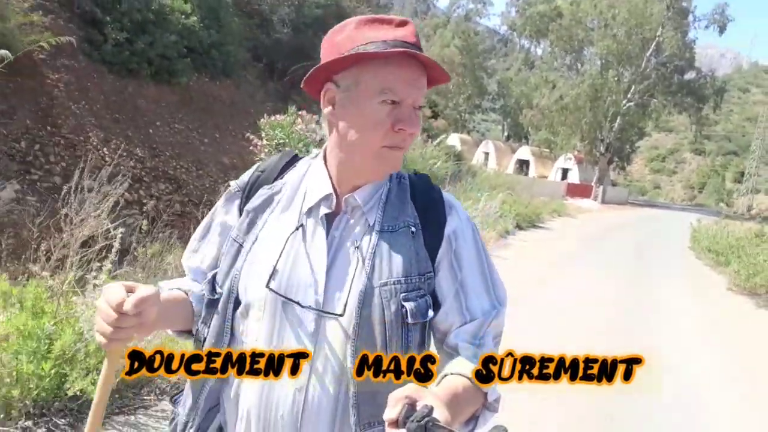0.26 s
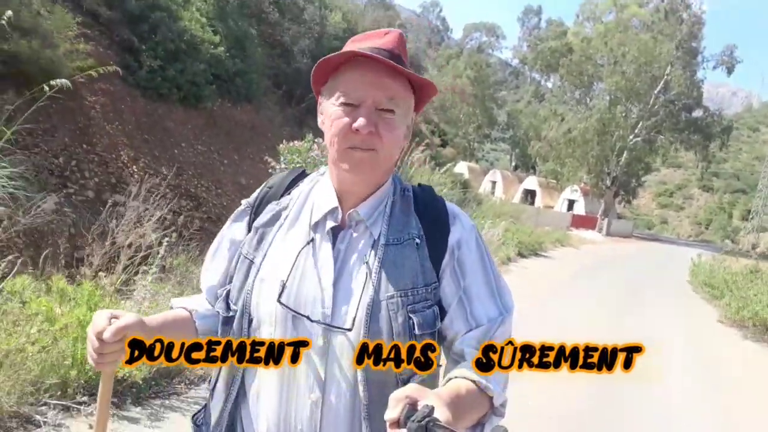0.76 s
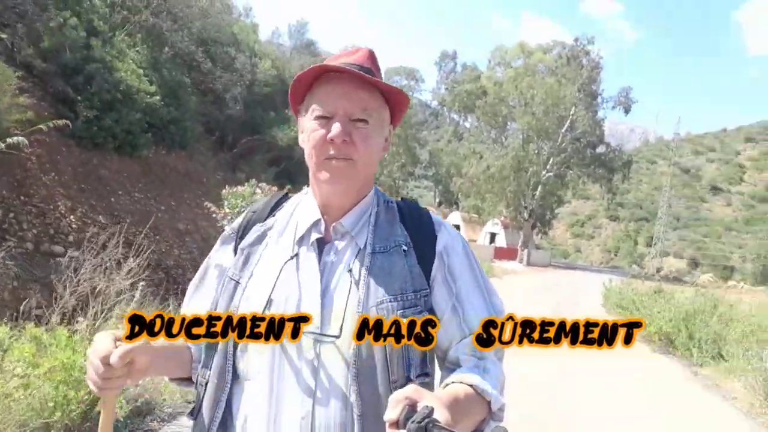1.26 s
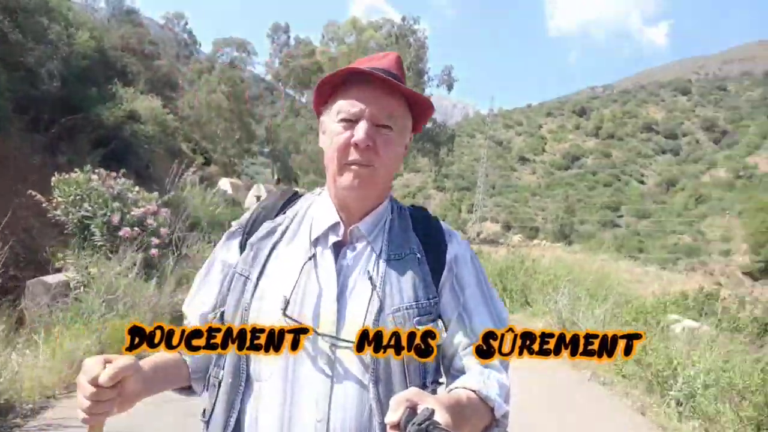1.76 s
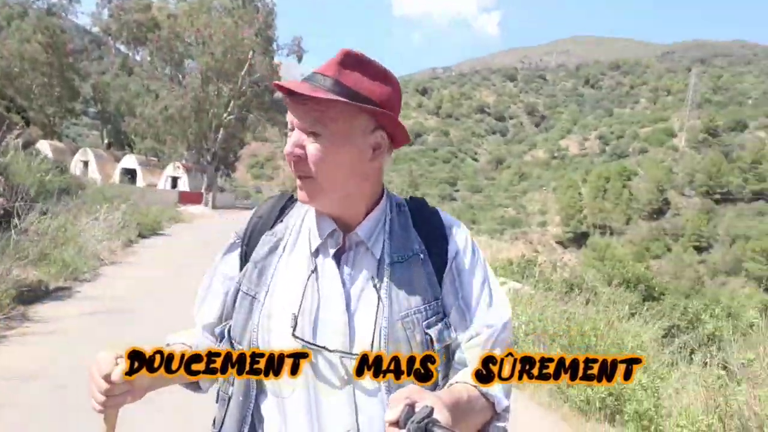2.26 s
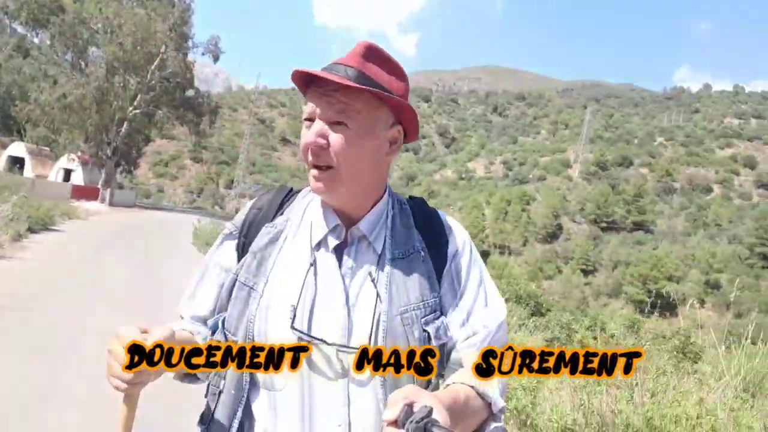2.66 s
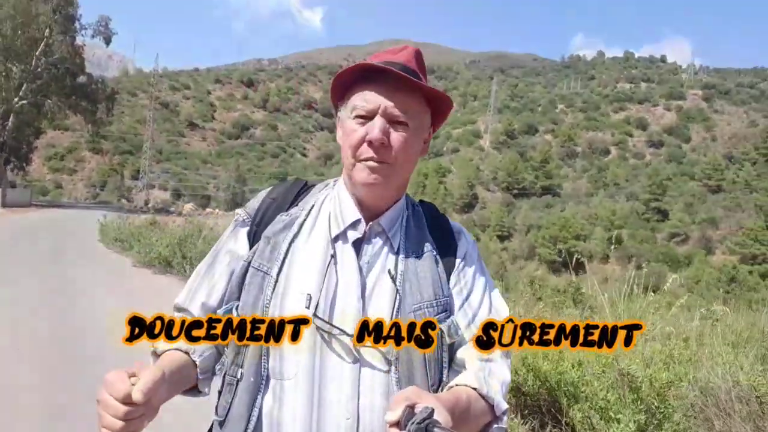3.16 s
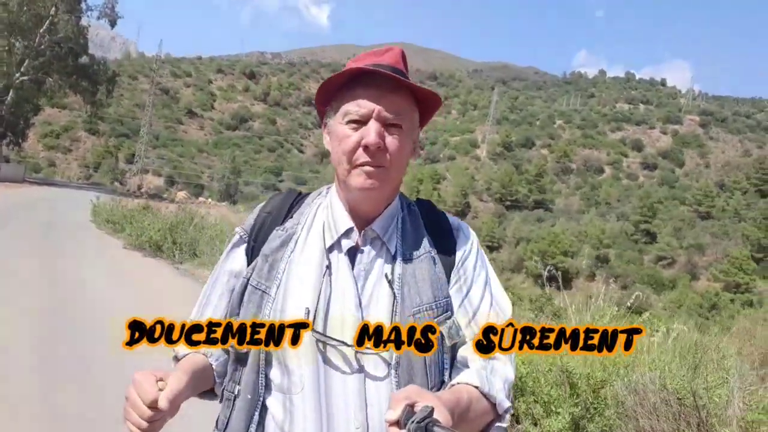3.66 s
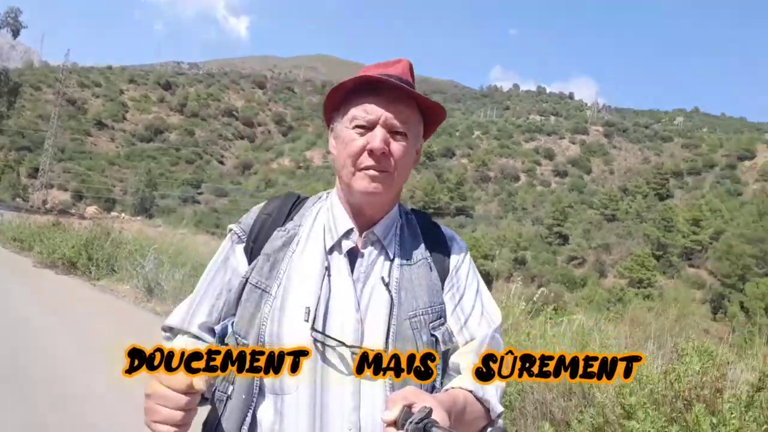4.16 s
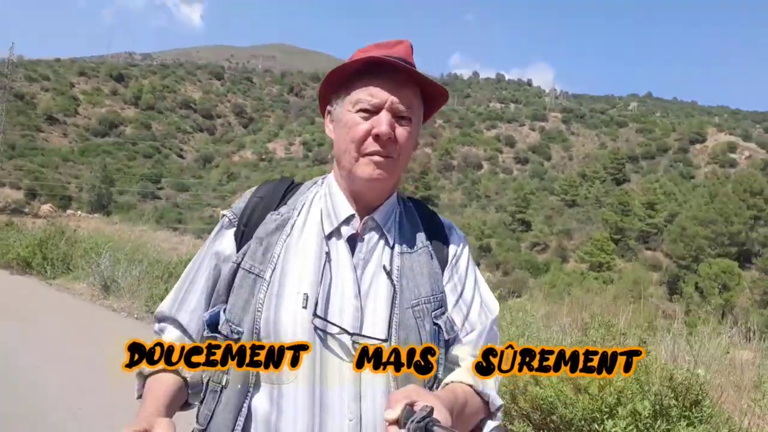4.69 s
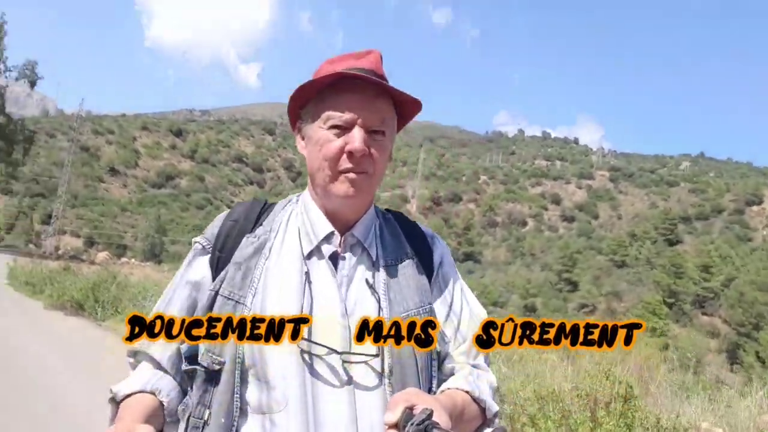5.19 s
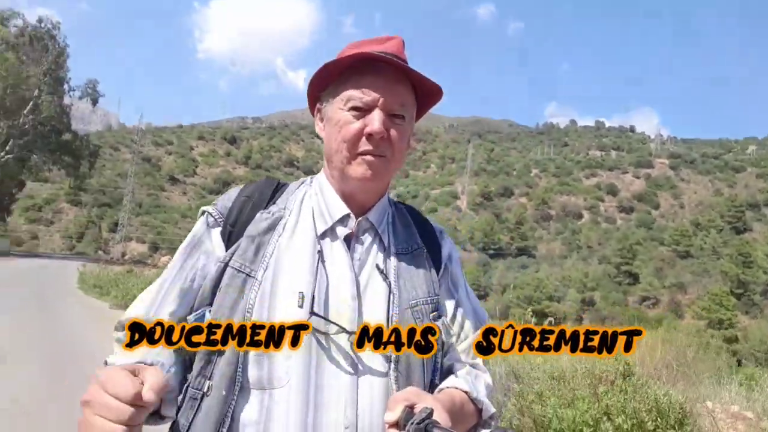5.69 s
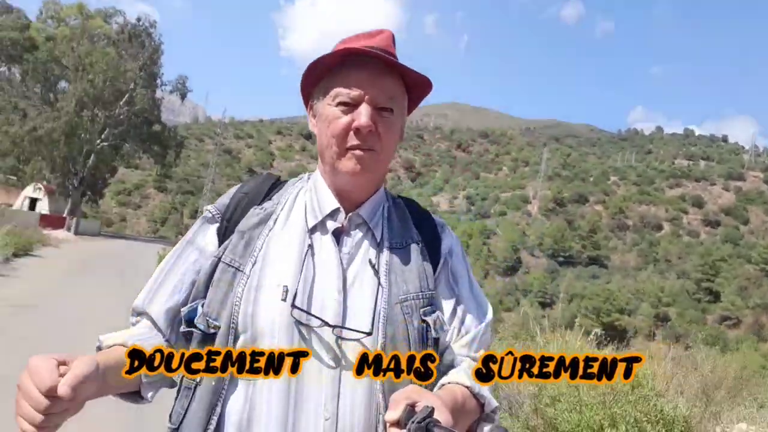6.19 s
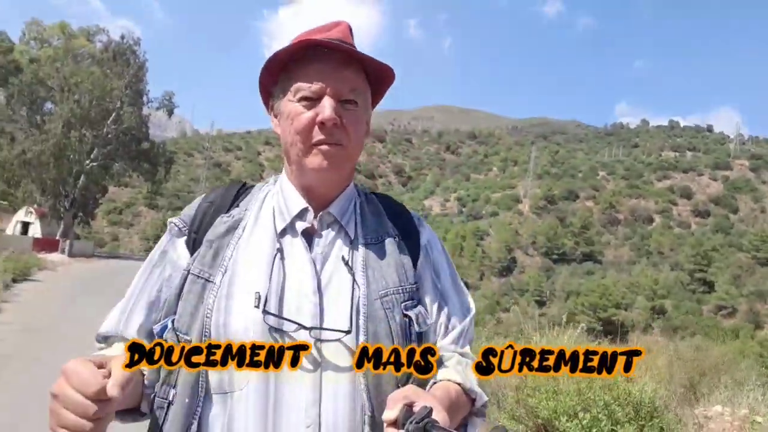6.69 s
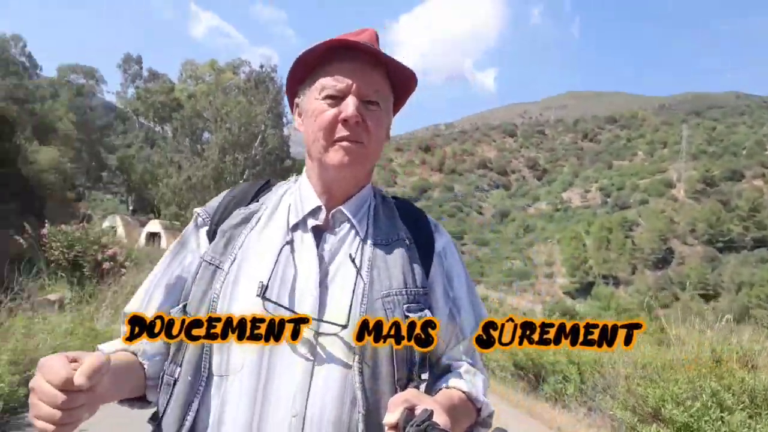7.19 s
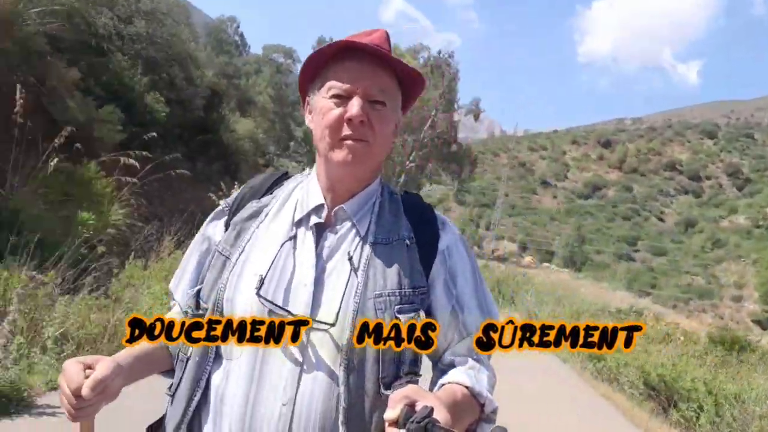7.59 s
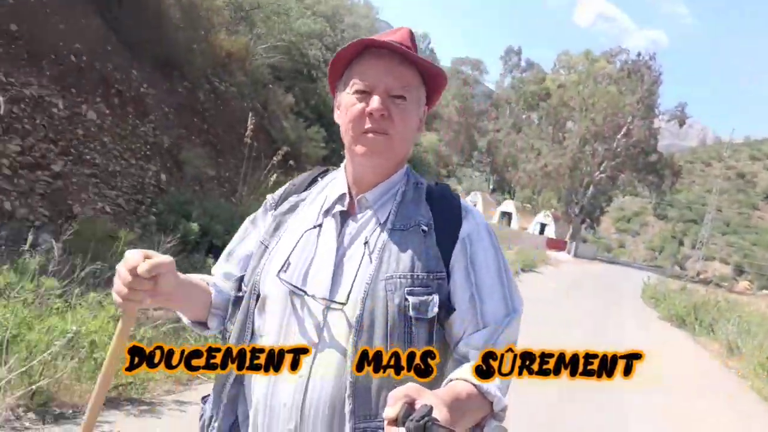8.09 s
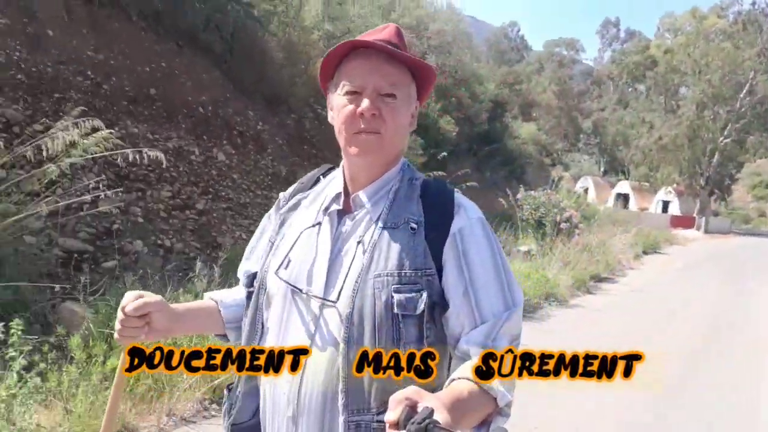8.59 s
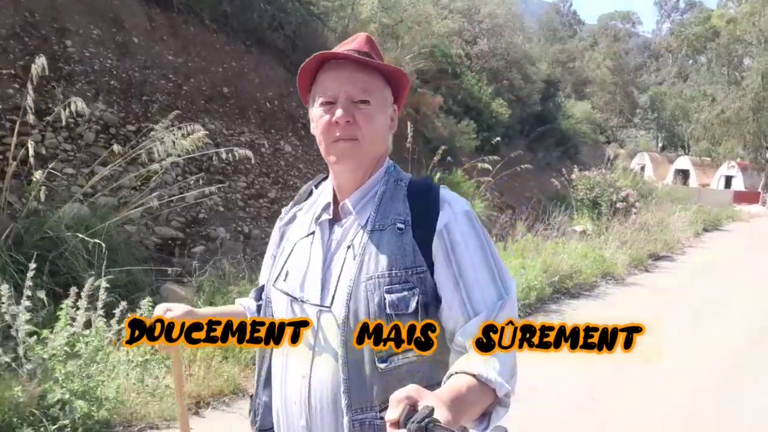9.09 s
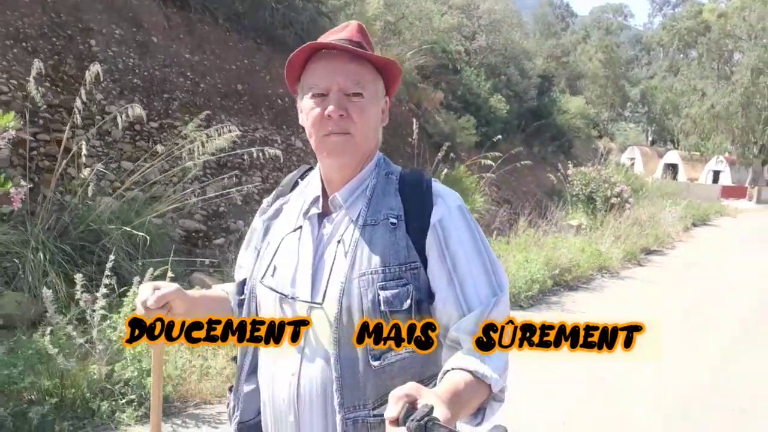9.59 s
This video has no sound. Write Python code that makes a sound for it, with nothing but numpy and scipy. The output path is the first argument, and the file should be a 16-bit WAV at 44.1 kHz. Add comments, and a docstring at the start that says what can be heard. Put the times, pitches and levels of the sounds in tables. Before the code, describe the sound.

A wooden walking stick knocks paving in slow even taps while wind buffets the microphone over a far engine drone and faint birdsong.

```python
"""A mountain road: wind buffets two microphone ports in lumps over a far engine built from sine orders.
Birds on the right whistle short gliding sines. From 0.4 s a wooden stick hits the paving on the left:
clicks and grit bounce and ring up its shaft. Engine, wind and road noise all dip together near 0.6 s
and soon return. Between blows shoes scuff and cloth rustles as shaped noise; the hardest blow falls
at 3 s. The wind is loudest near 8.5 s, and a last blow lands at 9.8 s."""
import sys
import numpy as np
from scipy import signal
from scipy.fft import rfft, irfft, next_fast_len
from scipy.io import wavfile
from scipy.ndimage import uniform_filter1d, map_coordinates

SR = 44100
rng = np.random.default_rng(int(sys.argv[2]) if len(sys.argv) > 2 else 0)


def waveform_to_disk(signal):
    """Save audio, clipped to [-1, 1], as 16-bit WAV at the path in sys.argv[1]."""
    frames = np.transpose(np.atleast_2d(signal))
    scaled = np.clip(frames, -1, 1) * 32767
    samples = np.round(scaled).astype(np.int16)
    wavfile.write(sys.argv[1], SR, samples)


N = 434385

PORT_LAG = .00022  # s by which a sound from the left reaches the right port late
# single eddies that thump out of the wind: t/s, level/dB, left over right/dB, bright edge over level/dB
THUMPS = [(0.383, -44.5, -16.5, -2), (0.969, -39, -7, -20), (1.169, -25.5, -3.5, -11),
          (1.269, -41, -28.5, -30), (1.443, -40.5, -9, -3.5), (1.799, -42.5, -22, -19),
          (3.329, -38, -17, -12), (3.677, -37, 3, -22), (4.049, -35, 18.5, -26.5),
          (4.591, -38.5, 14.5, -17), (4.83, -36.5, 11.5, -13), (4.987, -37.5, 16, -10),
          (5.716, -30.5, 15.5, -6), (5.931, -34.5, 3.5, -14), (6.199, -46.5, 10.5, -6),
          (6.331, -41.5, 15.5, -30), (6.684, -46.5, 19.5, 0.5), (6.979, -42, 11, 0),
          (7.141, -34.5, 10, -14), (7.202, -39.5, 14, -13), (8.45, -28.5, -20, -10.5),
          (8.495, -28, 12.5, 1), (8.559, -34.5, 5.5, -7), (8.729, -29.5, 7, -16), (8.998, -35.5, -7.5, -11),
          (8.798, -28.5, 16, -11.5), (9.05, -36, -15, -18.5), (9.782, -43, -15, -14)]
# a sole drags over grit: t/s, length/s, scuff level/dB, rustle level/dB (before the rustle's boost)
DRAGS = [(2.787, 0.12, -70, -81), (3.621, 0.039, -67, -78), (4.991, 0.074, -72, -79.5),
         (8.315, 0.25, -66, -78)]


def amp(db):
    """Gain of a level in dB."""
    return 10 ** (np.asarray(db) / 20)


def unit(x):
    """x scaled to an average (rms) strength of 1."""
    return x / np.sqrt(np.mean(x ** 2) + 1e-20)


def along(points, hz):
    """Reads a curve of (f/Hz, value) points at hz, on a log pitch axis."""
    f, v = np.transpose(points)
    return np.interp(np.log(hz + 1), np.log(f + 1), v)


def curves(rows):
    """One value per sample for each column after the time."""
    s, *cols = np.transpose(rows)
    return [np.interp(np.arange(N) / SR, s, c) for c in cols]


def wobble(rate):
    """A smooth random curve with rate knots a second."""
    knots = rng.standard_normal(int(N * rate / SR) + 4)
    return map_coordinates(knots, [np.arange(N) * rate / SR])


def filtered(x, response):
    """x times a complex response of frequency."""
    m = next_fast_len(x.shape[-1] + 8192)
    spectrum = rfft(x, m) * response(np.fft.rfftfreq(m, 1 / SR))
    return irfft(spectrum, m)[..., :x.shape[-1]]


def ports(x, lag, side):
    """One sound at both ports: the right hears it lag seconds late; side is (f/Hz, left over right/dB)."""
    port_turn = -.25  # radians by which the ports differ in phase at all pitches
    sign = np.array([[1], [-1]])

    def response(hz):
        phase = (np.pi * hz * lag + port_turn / 2) * sign
        return amp(sign * along(side, hz) / 2) * np.exp(1j * phase)

    return filtered(x, response)


def rush(spectrum, alike, patchy_db):
    """Stereo noise of rms 1 with patches of random gain; alike says how much both sides share."""
    z = signal.stft(rng.standard_normal((2, N)), nperseg=512)[2]
    field = rng.standard_normal(z.shape[1:])
    patches = unit(uniform_filter1d(uniform_filter1d(field, 8, 0), 10, 1))
    a, b = signal.istft(z * amp(patchy_db * patches), nperseg=512)[1][:, :N]
    turn = np.arccos(np.clip(alike, -1, 1)) / 2
    pair = np.array([np.cos(turn) * a + np.sin(turn) * b, np.cos(turn) * a - np.sin(turn) * b])
    return unit(filtered(pair, lambda hz: amp(along(spectrum, hz))))


def add(track, s, piece):
    """Mixes piece into track from second s."""
    seat = track[..., round(s * SR):][..., :piece.shape[-1]]
    seat += piece[..., :seat.shape[-1]]


def plus(db, power):
    """Level in dB of a level and a power together."""
    return 10 * np.log10(amp(2 * db) + power)


def swells(times, levels_db, rise_s, fall_s):
    """Summed power of events that rise to their time and fall after it."""
    t = np.arange(0, N, 32) / SR  # a coarse time grid is enough for slow swells
    power = 0
    for s, db in zip(times, levels_db):
        shape = np.exp(-((t - s) / np.where(t < s, rise_s, fall_s)) ** 2)
        power = power + amp(2 * np.asarray(db))[..., None] * shape
    return np.apply_along_axis(lambda row: np.interp(np.arange(N) / SR, t, row), -1, power)


def drone():
    """Far engine: sines at its firing rate and three overtones waver on the way through the air."""
    # firing pitch and its level as heard: t/s, f/Hz, level/dB
    firing = [(0, 76.6, -36), (.3, 77.3, -50), (.5, 77, -70.5), (.8, 78.4, -64.5), (1.1, 77.8, -47),
              (1.7, 78, -42.5), (2.1, 78.3, -42), (2.5, 77.8, -46), (3.3, 77, -36.5), (3.7, 77, -42.5),
              (4.5, 77.8, -45.5), (4.9, 77.3, -56), (5.7, 76, -37.5), (6.9, 76.8, -48), (7.3, 76.4, -42.5),
              (8.1, 75.3, -47.5), (8.7, 75.8, -40.5), (9.3, 76.7, -50), (9.85, 77.5, -58.5)]
    # overtones come and go: t/s, then orders 2, 3 and 4 over the first/dB
    overtones = [(0, -13, -30, -32), (1.3, -16, -31.5, -23), (1.9, -16, -17.5, -28), (3, -16, -23, -40.5),
                 (5, -18, -28.5, -20), (6, -22, -48, -29), (8.1, -28, -27, -24.5),
                 (9.85, -20, -29.5, -25.5)]
    hz, level_db = curves(firing)
    orders_db = [level_db] + [level_db + db for db in curves(overtones)]
    turn = 2 * np.pi * np.cumsum(hz) / SR + 0.064 * wobble(4.9)
    tone = np.zeros(N)
    for order, db in enumerate(orders_db, 1):
        tone += np.sqrt(2) * amp(db + 2.2 * wobble(5)) * np.sin(order * turn)
    return ports(tone, -1.5 * PORT_LAG, [(80, -3.0)])


def kicks():
    """Each thump kicks the diaphragms, which swing out at their own pitch on each port."""
    middle_hz, t60_s, kick_db = 95.6, 0.13, 8  # kick_db is added to the thump's level
    out, t = np.zeros((2, N)), np.arange(SR // 4) / SR
    for s, db, pan_db, _ in THUMPS:
        hz = middle_hz * np.exp(rng.normal(0, .15, (2, 1)))
        swing = np.sin(2 * np.pi * hz * t) * amp(-60 * t / t60_s) * (1 - np.exp(-t / 0.00396))
        add(out, s - .004, amp(db + kick_db + np.array([[pan_db], [-pan_db]]) / 2) * swing)
    return out


def wind():
    """Eddies buffet each port on its own, in lumps; strong ones grow a brighter edge."""
    # basic wind level on each port: t/s, left level/dB, right level/dB
    port_levels = [(0, -57.5, -35), (.45, -49.5, -45.5), (.65, -72.5, -68), (.9, -51.5, -56),
                   (1.2, -44, -35), (1.8, -50.5, -42.5), (2.5, -51, -53.5), (3.1, -49, -42.5),
                   (3.35, -61, -34), (3.55, -38, -57.5), (4.05, -32.5, -50), (4.3, -62.5, -48),
                   (4.65, -33.5, -59), (5.0, -42.5, -35), (5.3, -47, -52), (5.7, -39, -40.5),
                   (6.4, -44, -49.5), (6.7, -34.5, -47.5), (7.2, -46.5, -41), (7.7, -54, -63.5),
                   (8.2, -49, -40.5), (8.45, -29, -33), (9, -46.5, -42.5), (9.25, -53, -41.5),
                   (9.62, -69.5, -47), (9.85, -37, -38.5)]
    # colour of the buffeting: f/Hz, level per Hz/dB
    buffet_colour = [(20, -59.5), (40, -18.5), (55, 2), (70, -0.5), (95, 3), (140, -7.5), (220, -24.5),
                     (400, -46.5), (800, -68.5), (3000, -130)]
    # colour of the bright edge of strong eddies: f/Hz, level per Hz/dB
    edge_colour = [(60, -27.5), (130, 1), (250, -7), (450, -26), (800, -40.5), (1500, -86.5), (4000, -130)]
    # colour of the lowest rumble: f/Hz, level per Hz/dB
    deep_colour = [(15, -35), (28, -2.5), (45, 13.5), (65, 2), (90, -36.5), (300, -130)]
    thump_rise_s, thump_fall_s = 0.025, 0.021
    edge_rise_s, edge_fall_s = 0.012, 0.012
    s, db, pan_db, bright_db = np.transpose(THUMPS)
    sides_db = np.transpose([db + pan_db / 2, db - pan_db / 2])
    port_db = np.array(curves(port_levels))
    lumps_db = np.array([wobble(17), wobble(22)])
    thumps = swells(s, sides_db - 1.5, thump_rise_s, thump_fall_s)
    low_db = plus(port_db + 3 * lumps_db, thumps)
    edges = swells(s, sides_db + bright_db[:, None], edge_rise_s, edge_fall_s)
    edge_db = plus(port_db - 22.5 + 5 * lumps_db, edges)
    # the rumble follows the wind less steeply
    deep = amp(0.75 * (port_db + 44.5) - 49.5) * rush(deep_colour, 0, patchy_db=5.0)
    low = amp(low_db) * rush(buffet_colour, 0, patchy_db=0.0)
    edge = amp(edge_db) * rush(edge_colour, 0, patchy_db=1.5)
    return kicks() + deep + low + edge


def drags(levels_db):
    """Summed power of dragging soles: sudden start, hold, fade."""
    rise_s, fall_s = .004, 0.012
    t = np.arange(N) / SR
    power = np.zeros(N)
    for (s, length, *_), db in zip(DRAGS, levels_db):
        start = np.clip((t - s) / rise_s, 0, 1)
        power += amp(2 * db) * start * np.exp(-np.clip(t - s - length, 0, 1) / fall_s)
    return power


def surroundings():
    """Shaped noise: low air, scuffs and dragging soles, rustling cloth and grass, and a fine hiss."""
    # background levels before the boosts below: t/s, low air/dB, road noise/dB, rustle/dB
    around = [(0, -59.5, -79, -76.5), (.4, -69.5, -76, -77), (.65, -75.5, -90, -86.5),
              (1, -69.5, -77.5, -80), (2, -69, -80, -79.5), (2.55, -69.5, -81.5, -82.5),
              (3, -64, -80.5, -79), (3.4, -71, -82, -80.5), (4.1, -69.5, -81.5, -81.5),
              (4.7, -67, -81.5, -79.5), (5.5, -69, -81, -79.5), (6.6, -67.5, -81.5, -79.5),
              (7.6, -71, -81.5, -80), (8.2, -72, -79.5, -79), (9.1, -67.5, -78, -78),
              (9.55, -77.5, -83, -84.5), (9.85, -85, -76, -77)]
    # footfalls, before the scuff's boost: time of the loudest scuff t/s, level/dB
    footfalls = [(.4, -74.5), (.98, -77.5), (1.13, -74.5), (1.68, -71.5), (2.33, -79), (2.85, -71),
                 (3.07, -69), (3.67, -71.5), (4.37, -74), (5.06, -74.5), (5.77, -70), (6.45, -75.5),
                 (7.15, -73), (7.801, -76), (8.401, -73), (8.55, -77), (9.179, -78)]
    # colours of low air, scuffs, gravel under a dragged sole, cloth and grass, hiss: f/Hz, level per Hz/dB
    air_colour, scuff_colour, gravel_colour = [(120, -29.5), (200, -3), (310, -0.5), (400, -8.5),
                                               (600, -19.5), (1000, -49)], [(250, -37.5), (450, -2), (800, -1),
                                                            (1500, -7.5), (2500, -9.5), (3500, -13.5),
                                                            (5000, -38)], [(250, -11), (500, -0.5),
                                                                           (1000, -0.5), (2000, -6),
                                                                           (3500, -22.5), (6000, -59.5)]
    rustle_colour, hiss_colour = [(2500, -20), (3800, -6.5), (5700, -4), (6700, -8), (7300, -14),
                                  (8500, -30)], [(6000, -12), (8200, -10.5), (10000, -6.5), (13500, -1.5),
                                                  (15800, -3.5)]
    step_rise_s, step_fall_s = .05, 0.1
    thud_db, cloth_db = 9.5, -8  # what a footfall adds to low air and to rustle, over its scuff level
    steps = swells(*np.transpose(footfalls), step_rise_s, step_fall_s)
    _, _, drag_scuff_db, drag_rustle_db = np.transpose(DRAGS)
    air_db, road_db, still_db = curves(around)
    air_db = plus(air_db, amp(2 * thud_db) * steps)
    scuff_db = plus(road_db, steps)
    rustle_db = plus(still_db, amp(2 * cloth_db) * steps + drags(drag_rustle_db))

    crunch_db = 2.4 * wobble(520) + 1.9 * wobble(36)
    gravel = unit(amp(crunch_db) * rush(gravel_colour, .6, patchy_db=2.0))
    drag = np.sqrt(drags(drag_scuff_db)) * gravel
    air = amp(air_db + 5.5) * rush(air_colour, 0.56, patchy_db=6.0)
    rough_db = 1.8 * wobble(25) + 2 * wobble(250)
    scuff = amp(scuff_db + 4.5 + rough_db) * rush(scuff_colour, 0.16, patchy_db=0.46)
    rustle = amp(rustle_db + 4.0) * amp([[-2], [2]]) * rush(rustle_colour, 0.019, patchy_db=3.0)
    # the hiss follows the rustle only in part
    hiss_db = 0.59 * (rustle_db + 79.0) - 73
    hiss = amp(hiss_db) * amp([[.6], [-.6]]) * rush(hiss_colour, 0, patchy_db=2.0)
    return drag + air + scuff + rustle + hiss


def whistle(hz, db, late=0.87):
    """A sine on the pitch path hz swells (later for larger late) and fades, fluttering through leaves."""
    near_db, blur_per_db = -72, .2  # fainter notes come from farther away and tremble more
    waver_share = .008  # share by which the pitch trembles, before blur
    u = np.linspace(0, 1, len(hz))
    blur = 1 + blur_per_db * max(near_db - db, 0)

    def tremble(rate):
        return map_coordinates(rng.standard_normal(80), [np.arange(len(hz)) * rate / SR])

    flutter_db = 3 * np.sqrt(blur) * tremble(160)
    turn = 2 * np.pi * np.cumsum(hz * (1 + waver_share * blur * tremble(300))) / SR
    swell = np.sin(np.pi * u ** late) ** .4
    return np.sqrt(2) * amp(db + flutter_db) * swell * np.sin(turn)


def birds():
    """Small birds whistle: each note is a sine along part of a pitch shape, or along a straight glide."""
    # pitch shapes: t from the top note/s, f/Hz
    rise, arch, drop = [(-.13, 2450), (-.1, 2600), (-.065, 2900), (-.035, 3350), (-.015, 3750), (0, 4250)], [(-.09, 3700), (-.05, 4200), (-.025, 4800), (-.01, 5100), (0, 5150),
                                      (.012, 4950), (.022, 4000), (.035, 3500), (.055, 3450)], [(-.006, 6400), (0, 5700), (.008, 4300), (.018, 3550),
                                                    (.028, 3350), (.05, 3480)]
    # shaped notes: t of the top note/s, sung before it/s, sung after it/s, level/dB
    rise_notes, arch_notes, drop_notes = [(0.713, 0.036, 0, -80.5), (0.961, 0.039, 0, -73),
                                          (2.772, 0.087, 0.0048, -68), (4.587, 0.13, 0, -75),
                                          (6.29, 0.1, 0.0087, -71.5), (6.8, 0.059, 0.0099, -73),
                                          (7.703, 0.041, 0.0063, -69), (7.993, 0.11, 0.0067, -73),
                                          (8.794, 0.055, 0.0047, -70.5), (9.252, 0.069, 0.0073, -66.5)], [(1.258, 0.062, 0.017, -73.5),
                                                         (1.656, 0.091, 0.033, -72),
                                                         (3.555, 0.081, 0.014, -79),
                                                         (4.794, 0.09, 0.059, -65),
                                                         (5.177, 0.084, 0.03, -70),
                                                         (6.405, 0.047, 0.026, -79.5),
                                                         (9.143, 0.096, 0.0088, -77.5)], [(4.961, .002, 0.058, -70),
                                                                         (5.113, .001, 0.063, -71),
                                                                         (5.268, .002, 0.048, -71),
                                                                         (8.04, .004, 0.024, -79.5),
                                                                         (8.138, .002, 0.017, -78.5)]
    # plain glides: t/s, length/s, first f/Hz, last f/Hz, level/dB
    glides = [(0.277, 0.053, 6530, 4670, -69), (0.54, 0.068, 6500, 4800, -71),
              (1.473, 0.019, 6230, 5470, -68.5), (1.921, 0.028, 4900, 4720, -74),
              (2.95, 0.13, 4060, 4340, -75.5), (3.319, 0.088, 3730, 3600, -70.5),
              (3.21, 0.038, 2300, 2560, -72.5), (3.459, 0.042, 3950, 2900, -73),
              (3.791, .03, 3900, 3700, -72), (3.81, 0.04, 3790, 5020, -75),
              (4.101, 0.066, 4830, 4300, -78.5), (4.596, 0.034, 4060, 3240, -73),
              (4.613, 0.02, 6400, 5600, -70.5), (5.05, 0.039, 3300, 2740, -77.5),
              (5.342, 0.031, 3180, 2760, -80.5), (8.168, 0.027, 4200, 6500, -79),
              (8.25, 0.034, 4500, 3880, -76.5), (5.156, 0.039, 3200, 2670, -79),
              (4.75, 0.054, 3900, 3130, -81), (5.238, 0.047, 3200, 2750, -77.5),
              (8.076, 0.044, 3450, 2680, -77.5), (8.17, 0.053, 3500, 2670, -75),
              (8.273, 0.034, 3400, 2730, -71.5), (8.374, 0.028, 3300, 2700, -70),
              (9.378, 0.055, 4750, 4570, -80), (9.425, 0.036, 4250, 3970, -79),
              (9.49, 0.069, 4300, 4620, -80.5), (0.16, 0.017, 7600, 5400, -71),
              (.2, 0.035, 5600, 5370, -71), (1.089, 0.018, 6000, 5480, -72.5),
              (8.981, 0.044, 6180, 5680, -73), (9.639, 0.088, 4050, 4060, -82.5)]
    out = np.zeros(N)
    for shape, notes, late in ((rise, rise_notes, 1.8), (arch, arch_notes, 1.5), (drop, drop_notes, 1)):
        for top, before, after, db in notes:
            path = np.interp(np.arange(-before, after, 1 / SR), *np.transpose(shape))
            add(out, top - before, whistle(uniform_filter1d(path, size=200), db, late))
    for s, length, first_hz, last_hz, db in glides:
        add(out, s, whistle(np.geomspace(first_hz, last_hz, round(length * SR)), db))
    return out


def ticks():
    """Shoes and gear: a click starts a dull gritty scuff and a thin, quick snap; a few dry cracks."""
    # small ticks: t/s, click/dB, scuff/dB, snap/dB (boosted below), left over right/dB
    small_ticks = [(0.267, -46.5, -61, -77, -4), (0.864, -56, -65.5, -88, -9), (0.965, -54, -64, -80, -4),
                   (1.122, -55, -57, -80, -13), (1.165, -67, -64, -80, -2), (2.314, -43.5, -70, -85, -3),
                   (2.522, -56, -78, -80, -5), (2.787, -49, -58.5, -65, -5), (2.822, -62, -62, -85, -3),
                   (2.974, -49, -71.5, -80, -8), (3.587, -53.5, -74.5, -67, -13),
                   (3.654, -44, -51, -75, -0.5), (3.669, -34, -59.5, -80, -3), (4.355, -44, -64, -85, -3),
                   (5.044, -39, -62, -85, -2), (4.639, -57, -77, -59, -2), (4.946, -65.5, -64.5, -84, -5.5),
                   (5.072, -50, -59.5, -85, -3), (5.788, -41.5, -63, -85, -3.5),
                   (6.011, -56.5, -82.5, -62.5, 1), (6.212, -48.5, -65.5, -68.5, -1),
                   (6.431, -41.5, -58, -72.5, -2), (7.108, -47, -70, -85, -3),
                   (7.168, -41.5, -56.5, -68.5, -12), (7.809, -40, -76.5, -79, -2.5),
                   (8.322, -56, -71, -68, -8), (8.992, -58, -73, -64, -2), (9.123, -54.5, -68.5, -62, -1.5)]
    # thin dry cracks: t/s, level/dB, centre f/Hz, width/octaves
    cracks = [(4.639, -55, 13200, .4), (6.011, -62, 12000, .5), (7.727, -50, 4220, 0.65)]
    scuff_t60_s, snap_t60_s, crack_t60_s = 0.033, 0.018, 0.027
    out, t = np.zeros((2, N)), np.arange(SR // 6) / SR

    def band(x, centre_hz, octaves):
        return filtered(x, lambda f: np.exp(-(np.log2((f + 1) / centre_hz) / octaves) ** 2))

    lead = 60  # samples kept before the click
    click = band(1. * (np.arange(len(t)) == lead), 500, 1.67)
    for s, click_db, scuff_db, snap_db, pan_db in small_ticks:
        # grit breaks in bits: a new random level every 60 samples
        grains_db = 6.5 * np.repeat(rng.standard_normal(len(t) // 60 + 1), 60)[:len(t)]
        scuff_noise = unit(band(rng.standard_normal(len(t)), 730, 0.8))
        scuff = amp(scuff_db - 60 * t / scuff_t60_s + grains_db) * scuff_noise
        snap_noise = unit(band(rng.standard_normal(len(t)), 5560, 0.5))
        snap = amp(snap_db + 11.0 - 60 * t / snap_t60_s) * snap_noise
        puff = amp(click_db) * click / click.max() + np.roll(scuff + snap, lead)
        add(out, s - lead / SR, ports(puff, PORT_LAG / 2, [(1000, pan_db)]))
    for s, db, hz, octaves in cracks:
        crack = unit(band(rng.standard_normal((2, len(t))), hz, octaves))
        add(out, s, amp(db - 60 * t / crack_t60_s) * crack)
    return out


def stick():
    """Tip clicks and grit run up the shaft and back; treble is faster, so they return as falling chirps."""
    # contacts, blows and bounces: t/s, level/dB (4 dB is added below), weight at 500 Hz/dB,
    # knock at 1400 Hz/dB, hardness at 3800 Hz/dB, grit over the click/dB
    contacts = [(0.391, -15.5, -6, -2, 2, -5.5), (0.395, -34.5, -3.5, 2, -11.5, 4),
                (0.4, -28.5, 1, 2, 4.5, 4.5), (1.647, -44.5, 6.5, -7, -11, 4),
                (1.685, -18.5, -8, 3, 4.5, 1), (1.693, -19, -1, 4, -1, -2.5),
                (1.7, -28, 4, 0.5, -3.5, -0.5), (3.0413, -4, -8, -1, 5.5, -16),
                (3.051, -5.5, -9, 1.5, 2.5, -14.5), (3.0558, -12, -4.5, -3, 8.5, -5.5),
                (4.223, -18, -3.5, 2.5, -1, -8.5), (4.23, -22.5, -4.5, -0.5, 6.5, -4),
                (4.235, -28, 3, 1, 1, -1.5), (5.7275, -17.5, -5, 3, 6, 2), (5.734, -24.5, -11, -3, 13, -4),
                (5.738, -12, 0, 3, -10.5, -10), (7.012, -19, -1, 9, 13, -2.5),
                (7.025, -13.5, -2, -1, 3.5, -12), (7.031, -26, -3, -2.5, 4, 1.5),
                (7.695, -44, 12, 4.5, -7, 5), (7.727, -32.5, 16.5, 9, -8, -2),
                (8.472, -17, -6, -11, 7.5, -4.5), (8.474, -31, -3.5, 8, -1, -0.5),
                (9.819, -28.5, -4, -4, 10.5, 2.5), (9.829, -20, -0.5, -1, 15, -0.5)]
    # bending modes of the shaft: f/Hz, colour of the click/dB
    shaft = [(0, -24.5), (303, -8.5), (585, -8.5), (915, -1.5), (1235, -0.5), (1585, 6), (1950, 6),
             (2450, 3), (2930, -4), (3330, -6.5), (3820, -10), (4320, -9.5), (4820, -18.5), (5330, -18.5),
             (5850, -20.5), (6450, -15.5), (6950, -21.5), (7600, -28.5), (8300, -42), (10000, -39),
             (16000, -47.5)]
    # colour of crushed grit: f/Hz, level per Hz/dB
    grit_colour = [(120, -25), (250, -2.5), (543, -4), (1590, -3.5), (3130, -10.5), (4350, -19.5),
                   (7140, -21.5), (8140, -45.5), (15500, -47)]
    # wood and hand damp each round trip: f/Hz, gain/dB
    loss = [(300, -5), (600, -6), (900, -7), (1400, -6), (2500, -6), (5000, -7), (9000, -16.5)]
    # side the stick is heard from: f/Hz, left over right/dB
    stick_side = [(300, -3), (800, -.7), (2800, -2), (5500, -2.5), (9000, 6)]
    # drifting bearing of the tip: t/s, lateness at the right port/microseconds
    stick_lag = [(.4, 250), (1.7, 250), (3.05, 222), (4.23, 210), (5.73, 255), (7.02, 262), (7.7, 235),
                 (8.47, 255), (9.82, 225)]
    mode_step_hz = 704.3  # spacing of the modes above the table
    out, bare, t = np.zeros((2, N)), np.zeros(N), np.arange(SR // 8) / SR
    mode_hz, colour_db = np.transpose(shaft)
    lead = 20  # samples kept before the click
    for s, db, weight_db, knock_db, hard_db, grit_db in contacts:
        scatter_db, detune = rng.normal(0, 1.5, len(shaft)), rng.normal(1, .008)
        grip_db, aim_db = rng.normal(0, 1.2, (2, len(shaft)))  # each mode is damped and aimed anew
        hardness = [(500, weight_db), (1400, knock_db), (2200, 0), (3800, hard_db), (8000, hard_db / 2)]

        def cycles(f):  # one round trip turns the phase by a whole cycle at every mode
            listed = np.interp(f * detune, mode_hz[:-1], np.arange(len(shaft) - 1))
            return listed + np.clip(f * detune - mode_hz[-2], 0, None) / mode_step_hz

        def trip(f):
            damping_db = np.minimum(along(loss, f) + np.interp(f, mode_hz, grip_db), -4.5)
            return amp(damping_db) * np.exp(-2j * np.pi * cycles(f))

        def touch(f):
            return amp(along(hardness, f))

        def click(f):  # the shaft near the tip radiates, which already spreads the click
            colour = amp(np.interp(f, mode_hz, colour_db + scatter_db))
            return touch(f) * colour * np.exp(-2j * np.pi * 0.38 * cycles(f))

        onset = np.clip((t - lead / SR) / 0.0002, 0, 1) ** 2
        blow = filtered(1. * (np.arange(len(t)) == lead), click) * onset
        grit = unit(filtered(rng.standard_normal(len(t)), lambda f: touch(f) * amp(along(grit_colour, f))))
        crush = amp(grit_db - 60 * t / 0.018) * grit * (1 - np.exp(-t / 0.00093))
        contact = amp(db + 4.0) * (blow / np.abs(blow).max() + np.roll(crush, lead))
        # adding up all round trips makes the shaft ring
        ringing = filtered(contact, lambda f: 1 / (1 - trip(f)))
        lag = np.interp(s, *np.transpose(stick_lag)) / 1e6
        side = np.transpose([mode_hz, along(stick_side, mode_hz) + aim_db])
        add(out, s - lead / SR, ports(ringing, lag, side))
        add(bare, s - lead / SR, contact)
    return out, bare


def echoes(x, t60s):
    """Lumpy echoes from fading noise; each frequency dies at its own speed."""
    hz, t, z = signal.stft(rng.standard_normal((2, SR // 2)), SR, nperseg=256)
    lumps_db = 2.5 * wobble(50)[::128][:len(t)]
    fade_db = lumps_db - 60 * t / along(t60s, hz)[:, None]
    tail = signal.istft(z * amp(fade_db), SR, nperseg=256)[1]
    late = np.pad(x, (120, 0))[None]  # 120 samples before the first echo
    return signal.fftconvolve(late, tail / np.linalg.norm(tail[0]), axes=1)[:, :N]


def scene():
    """The stick stands left of the microphone, the birds to its right."""
    # echo times of the roadside bank and among the trees: f/Hz, time to fall by 60 dB/s
    bank_t60, trees_t60 = [(300, 0.27), (2000, 0.13), (5000, 0.23), (10000, 0.021)], [(3000, 0.22), (6000, .3)]
    # high singers sit deeper in the trees: f/Hz, gain into the echo/dB
    song_echo = [(4500, -7.5), (5800, -2)]
    taps, contacts = stick()
    song = birds()
    near = taps + amp(-24.0) * echoes(contacts, bank_t60) + ticks()
    direct_song = amp(1.0) * ports(song, -PORT_LAG, [(4000, -10.0)])
    deep_song = filtered(song, lambda hz: amp(along(song_echo, hz)))
    far = direct_song + echoes(deep_song, trees_t60)
    return near + far + drone() + wind() + surroundings()


def record(dry):
    """Nothing at or above a sharp upper limit is kept."""
    top_hz = 15830
    return filtered(dry, lambda hz: hz < top_hz)


dry = scene()
out = record(dry)
waveform_to_disk(out)
```